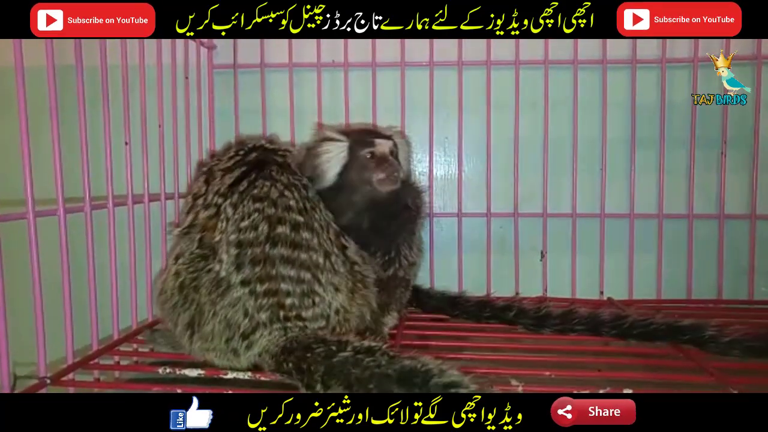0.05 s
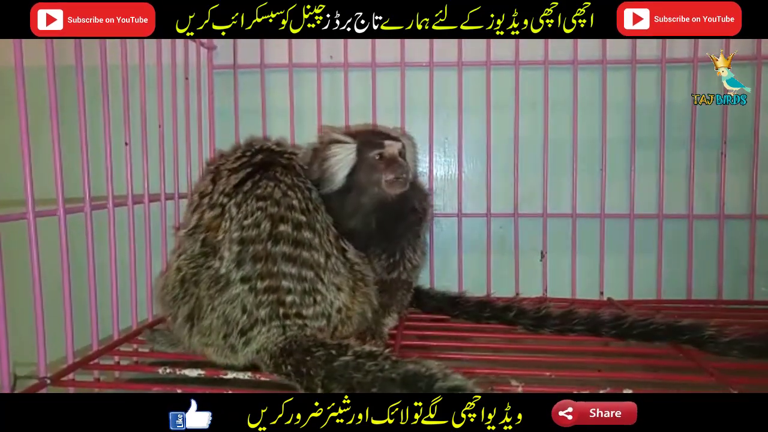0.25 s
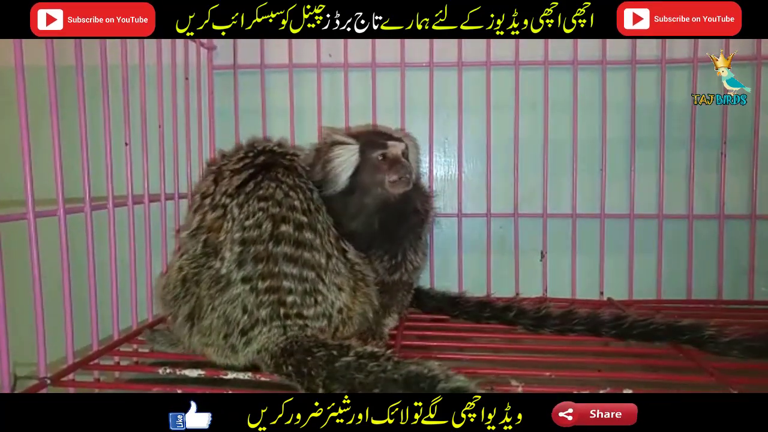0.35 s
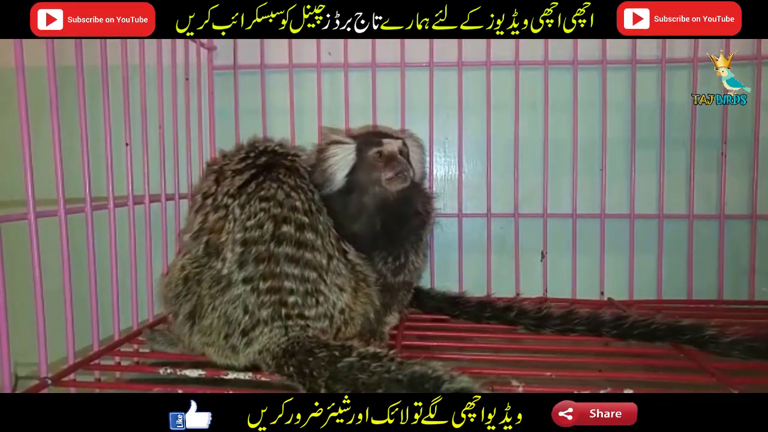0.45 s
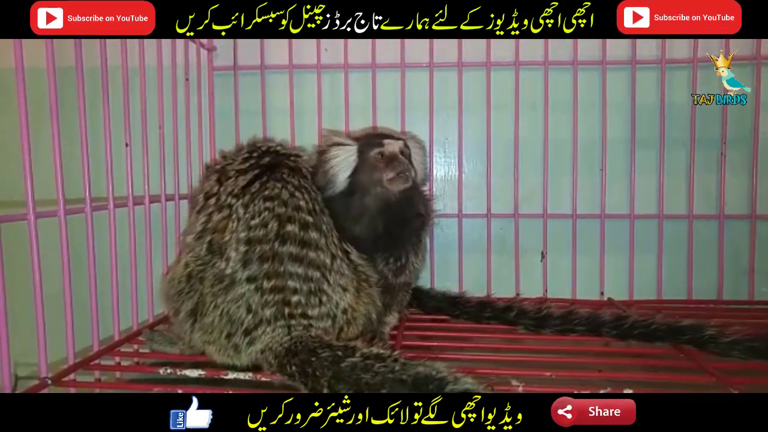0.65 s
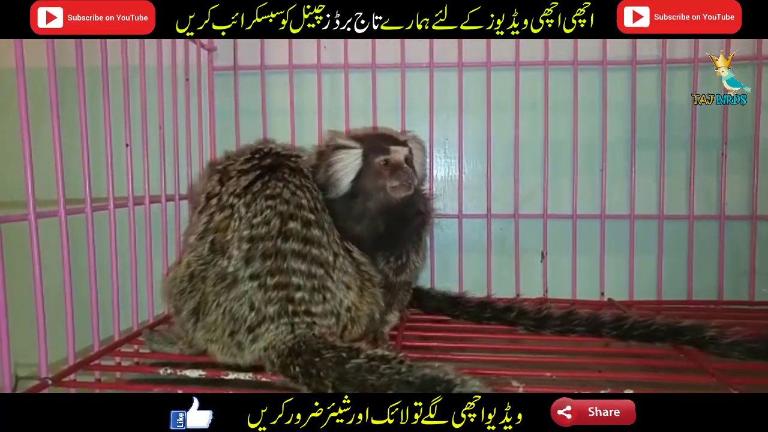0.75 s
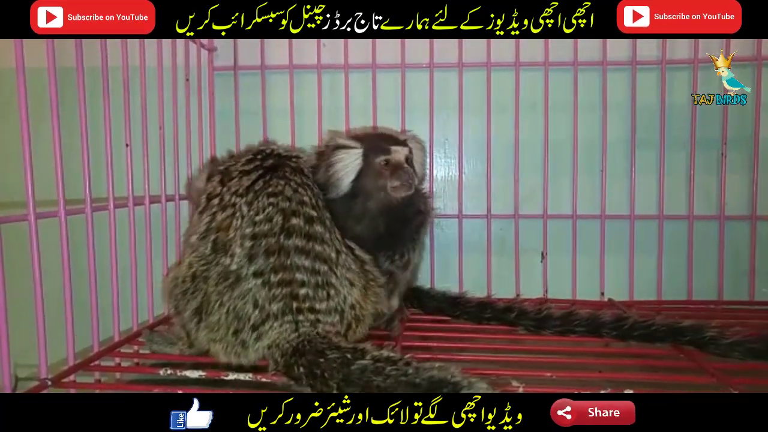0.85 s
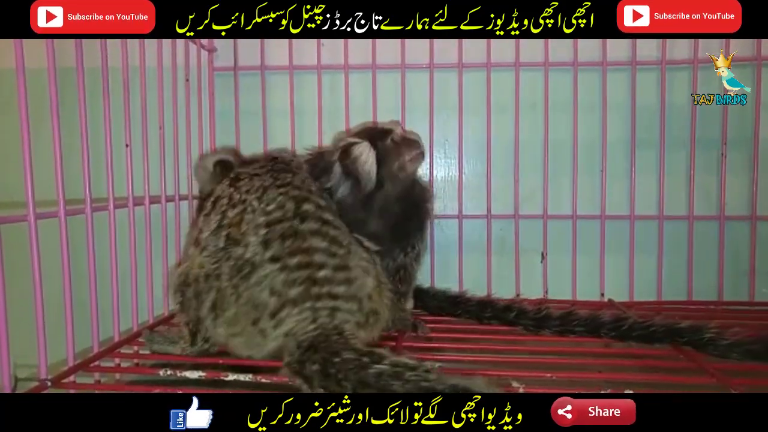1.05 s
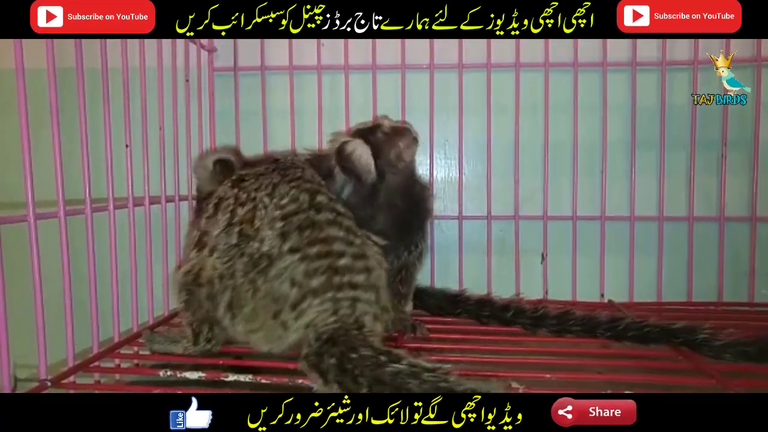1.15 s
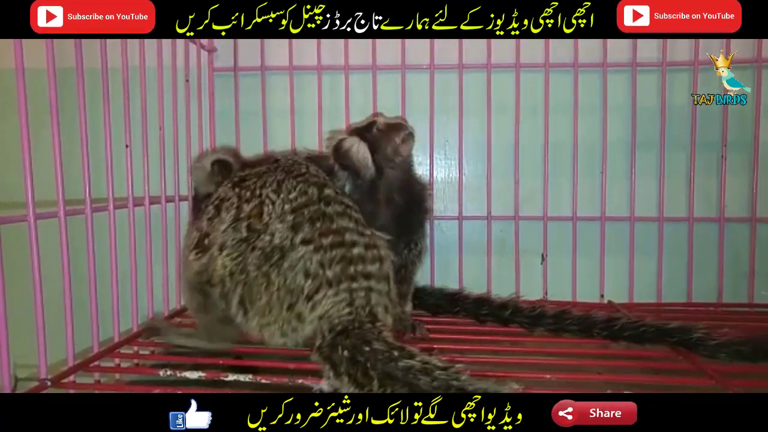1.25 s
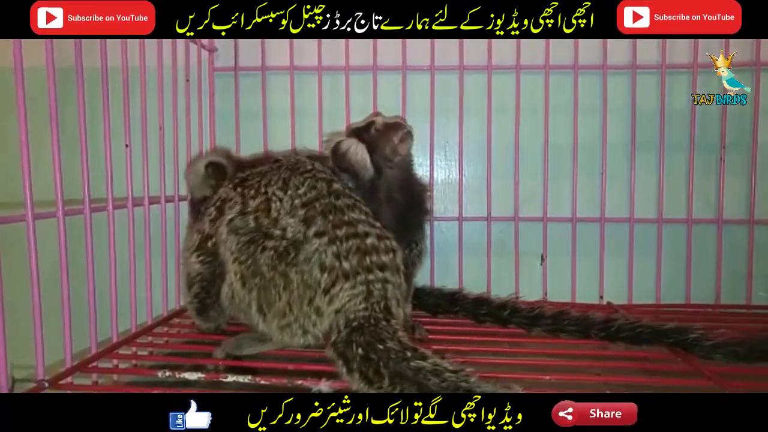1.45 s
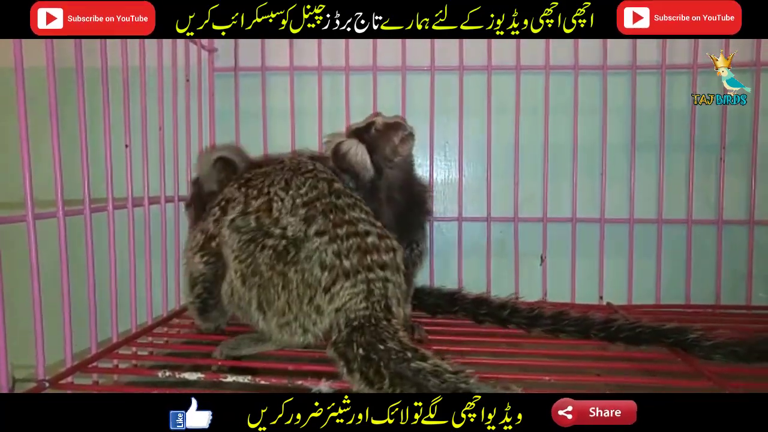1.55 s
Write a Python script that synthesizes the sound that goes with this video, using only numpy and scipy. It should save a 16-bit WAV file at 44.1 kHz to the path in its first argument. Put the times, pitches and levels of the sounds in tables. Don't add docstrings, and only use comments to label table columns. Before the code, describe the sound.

Small monkeys call in a bare, echoing room. A fading trill and tiny peeps open; at 0.18 s a paw knocks the wire cage with a bright rustle as a close, piercing pure whistle bends upward until 0.34 s. Distant trills climb until 0.6 s, then a higher one descends from 0.7 to 1.1 s. A faint bird squawk follows at 1.13 s, then a weak peep near 1.53 s, over quiet fan hum and scuffles.

```python
import sys
import numpy as np
from scipy import signal
from scipy.fft import rfft, irfft
from scipy.io import wavfile

SR = 44100
rng = np.random.default_rng(int(sys.argv[2]) if len(sys.argv) > 2 else 0)


def gain_from_db(level_db):
    decades = np.asarray(level_db, float) / 20
    return 10 ** decades


def store_pcm(level_fs):
    pcm = np.round(np.clip(level_fs, -1, 1) * 32767).astype(np.int16)
    wavfile.write(sys.argv[1], SR, np.atleast_2d(pcm).T)


N = 70560
LEAD = 11025
TOTAL = N + LEAD


def seconds():
    return np.arange(-LEAD, N) / SR


def rms_one(x):
    return x / np.sqrt(np.mean(x ** 2) + 1e-20)


def at_hz(points, hz):
    curve_hz, value = np.array(points).T
    return np.interp(np.log(hz), np.log(curve_hz), value)


def drift(rate_hz):
    r = np.exp(-2 * np.pi * rate_hz / SR)
    wander = signal.lfilter([1], [1, -2 * r, r * r], rng.standard_normal(TOTAL + SR))
    return rms_one(wander[SR:])


def coloured(spectrum, alike):
    hz = np.maximum(np.arange(TOTAL // 2 + 1) * SR / TOTAL, 10)
    octaves_below = np.maximum(np.log2(spectrum[0][0] / hz), 0)
    tilt = gain_from_db(at_hz(spectrum, hz) - 20 * octaves_below)
    mid, side = rfft(rng.standard_normal((2, TOTAL))) * tilt
    c = np.clip(at_hz(alike, hz), 0, 1)
    both = np.sqrt(1 + c) * mid + np.sqrt(1 - c) * side * [[1], [-1]]
    return rms_one(irfft(both, TOTAL))


def place(x, direct_db, wet_db, pan_db, lag=0):
    wet_pan = 0.42 * pan_db / 2
    return np.array([np.roll(x, lag) * gain_from_db(direct_db + pan_db / 2),
                     x * gain_from_db(direct_db - pan_db / 2),
                     x * gain_from_db(wet_db + wet_pan),
                     x * gain_from_db(wet_db - wet_pan)])


def call(contour, trill_hz=30, top_s=0., overtones_db=(), throat_hz=15500, jitter_hz=15, shimmer_db=1, low_db=0):
    t = seconds()
    s, hz, db, *depth_hz = np.transpose(contour)
    swing = 0
    if depth_hz:
        swing = np.interp(t, s, depth_hz[0]) * np.cos(2 * np.pi * trill_hz * (t - top_s))
    pitch = np.interp(t, s, hz) + swing + jitter_hz * drift(61.6)
    phase = 2 * np.pi * np.cumsum(pitch) / SR
    tone = np.sin(phase)
    for k, db_k in enumerate(overtones_db, 2):
        throat_loss_db = 0.0085 * np.maximum(k * pitch - throat_hz, 0)
        tone = tone + gain_from_db(db_k - throat_loss_db) * np.sin(k * phase)
    loudness_db = np.interp(t, s, db, -150, -150) + shimmer_db * drift(60) - low_db * swing / 1000
    return np.sqrt(2) * tone * gain_from_db(loudness_db)


def room(x):
    # pitch_hz, t60_s
    room_t60 = [(1200, .8), (3500, .7), (8000, .42), (14000, .22)]
    early_t60_s, early_db, first_echo_s = .15, -4, .004
    t = np.arange(SR) / SR
    edges = 300 * 2 ** np.arange(0, 6.1, .5)
    white = rng.standard_normal((2, 2, SR))
    echoes = 0
    for k, (low, high) in enumerate(zip(edges, edges[1:])):
        t60 = at_hz(room_t60, np.sqrt(low * high))
        early = gain_from_db(2 * early_db - 120 * t / early_t60_s) / early_t60_s
        tail = gain_from_db(-120 * t / t60) / t60
        fall = np.sqrt(early + tail) * (t > first_echo_s)
        bandpass = signal.butter(2, [low, high], "band", fs=SR, output="sos")
        band = signal.sosfilt(bandpass, white[k % 2])
        echoes = echoes + band * fall / np.sqrt(np.sum(fall ** 2))
    return signal.fftconvolve(x, echoes, axes=1)[:, :x.shape[1]]


def fan():
    # time_s, level_db
    fan_effort = [(0, 1.5), (.3, 3.5), (.7, 3), (.82, 5.5), (1.08, 3), (1.2, 3), (1.4, -1.5), (1.6, 4)]
    # pitch_hz, level_db (rms), wander_db
    hum_lines = [(48.4, -72, -4.5), (77.2, -70, 5.5), (99.9, -60, -3.5), (373, -77.5, 5)]
    # pitch_hz, level_db (per Hz)
    room_noise = [(34, -30), (42, -12), (150, -16), (380, -15), (500, -24), (750, -20), (1600, -30),
                  (9500, -37), (12500, -57)]
    # pitch_hz, likeness (0 to 1)
    likeness = [(60, 0.7), (250, 0.77), (480, 0.84), (1000, 0.11), (8000, 0.11)]
    t = seconds()
    effort_db = np.interp(t, *np.transpose(fan_effort))
    hum = 0
    for hz, db, wander_db in hum_lines:
        level = np.sqrt(2) * gain_from_db(db + wander_db * drift(4.1))
        hum = hum + level * np.sin(2 * np.pi * hz * t + 0.16 * drift(9.8) + rng.uniform(0, 5.28))
    air = gain_from_db(-61.5 + effort_db + 0.89 * drift(15)) * coloured(room_noise, likeness)
    return hum * gain_from_db(0.8 * effort_db) + air


def scuffles():
    # start_s, length_s, level_db
    bursts = [
        (0.355, 0.3, -64),
        (0.715, 0.08, -58.5),
        (1.148, 0.061, -63),
    ]
    # pitch_hz, level_db (per Hz)
    scuffle_colour = [(900, -2), (1400, 7.5), (2500, 8), (3300, 5.5), (4500, 7.5), (6000, -38.5),
                      (8000, -59)]
    t = seconds()
    swell = 0
    for s, length, db in bursts:
        rise = np.clip((t - s) / 0.03, 0, 1)
        fall = np.exp(-np.maximum(t - s - length, 0) / 0.044)
        swell = swell + gain_from_db(db) * rise * fall
    noise = coloured(scuffle_colour, [(100, .01), (10000, .01)]) * swell * gain_from_db(1.5 * drift(17))
    return np.vstack([noise, 0 * t, 0 * t])


def birds():
    # time_s, pitch_hz, level_db
    squawk_contour = [(1.128, 990, -92), (1.136, 1015, -60), (1.152, 1035, -57), (1.175, 1030, -63),
                      (1.205, 1030, -66), (1.225, 1030, -76), (1.25, 1035, -66), (1.275, 1030, -74),
                      (1.3, 1025, -95)]
    # start_s, length_s, pitch_hz, level_db
    far_chirps = [
        (0.339, 0.12, 1381, -63.5),
        (0.436, 0.12, 2143, -66),
        (0.712, 0.081, 2358, -63.5),
        (0.965, 0.058, 1856, -64.5),
    ]
    squawk = call(squawk_contour, overtones_db=(-7, -10.5, -14, -14), jitter_hz=7.36, shimmer_db=1.5)
    far = 0
    for s, length, hz, db in far_chirps:
        end = s + length
        chirp = [(s, hz, db - 10), (s + .02, hz, db), (end, hz, db), (end + .02, hz, db - 20)]
        far = far + call(chirp, jitter_hz=13)
    return place(squawk, -0.49, 3.1, 0.44) + place(far, -10.0, -0.63, 0.27)


def cage():
    # time_s, level_db (peak)
    knocks = [
        (0.1777, -40),
        (0.1805, -43.5),
        (1.4734, -74.5),
        (1.5925, -56),
    ]
    # pitch_hz, level_db, t60_s
    modes = [(773, -10.5, 0.36), (1056, 6, 0.026), (1290, 10, 0.039), (1514, 2.5, 0.02),
             (3830, -20.5, 0.0171), (7600, 16, 0.026), (8600, 12, 0.026)]
    # pitch_hz, level_db (per Hz)
    rustle_colour = [(3000, -25.5), (4300, -6), (5500, -7), (8000, 1), (14500, -2), (16000, -15)]
    rustle_s, rise_s, fall_s, rustle_db = .177, 0.012, 0.021, -33.5
    ring = np.zeros(TOTAL)
    strength_db = rng.normal(0, 1.1, (len(knocks), len(modes)))
    for k, (hz, level_db, t60) in enumerate(modes):
        clicks = np.full(TOTAL, 1e-18)
        for (s, db), own_db in zip(knocks, strength_db):
            clicks[int(s * SR) + LEAD] = gain_from_db(db + level_db - 12 + own_db[k])
        r = gain_from_db(-60 / (t60 * SR))
        w = 2 * np.pi * hz / SR
        ring += signal.lfilter([0, np.sin(w)], [1, -2 * r * np.cos(w), r * r], clicks)
    u = np.maximum(seconds() - rustle_s, 0)
    puff = (1 - np.exp(-u / rise_s)) * np.exp(-u / fall_s) * gain_from_db(rustle_db + 4 * drift(300))
    hiss = coloured(rustle_colour, [(100, 0.6), (10000, 0.48)]) * puff
    return place(ring, 0.3, -8, 3) + np.vstack([hiss, gain_from_db(-10) * hiss])


def distant_monkeys():
    # time_s, pitch_hz, level_db, and for trills depth_hz (vibrato)
    earlier_low = [(-.1, 4770, -86, 200), (.02, 4470, -64.5, 250), (.14, 4840, -72, 200),
                   (.17, 4400, -86, 198)]
    earlier = [(-.2, 6000, -37, 600), (-.15, 6530, -63.5, 900), (-.03, 7194, -47, 1163),
               (0.0, 6960, -60, 291), (.04, 7120, -49, 99)]
    peeps = [(.07, 7450, -80), (.09, 7500, -60), (.114, 7530, -55), (.126, 7480, -75), (.137, 7390, -52),
             (.158, 7370, -56), (.166, 7400, -85)]
    rising = [(.195, 4530, -70, 195), (.215, 5080, -40, 284), (.25, 5296, -44, 208), (.33, 5680, -44, 350),
              (.44, 5995, -44, 537), (.5, 6490, -44.5, 580), (.55, 7160, -43.5, 518), (.59, 7700, -54, 402),
              (.61, 7200, -79, 384)]
    level_trill = [(.39, 4950, -85, 250), (.405, 5000, -51, 400), (.43, 4950, -44, 250),
                   (.455, 4870, -44, 170), (.49, 4900, -50, 300), (.53, 4850, -52, 350),
                   (.57, 4800, -58, 300), (.61, 4750, -64, 250), (.63, 4750, -85, 250)]
    rising_again = [(.68, 4970, -50, 155), (.698, 4980, -45.5, 153), (.76, 5560, -50, 292),
                    (.82, 6094, -49.5, 540), (.88, 6270, -52.5, 560), (.94, 6350, -47, 507),
                    (.985, 5880, -108, 309.5), (1.0, 5800, -84, 300)]
    falling = [(.7, 9350, -75, 100), (.718, 9100, -53, 350), (.737, 8800, -36.5, 600),
               (.81, 8650, -37.5, 680), (.87, 8250, -41, 950), (.96, 7950, -39, 650),
               (1.015, 8080, -37, 220), (1.062, 8220, -29, 50), (1.078, 8180, -41, 40),
               (1.135, 8150, -66, 40)]
    last = [(1.52, 6060, -85), (1.525, 6060, -56), (1.536, 6080, -53), (1.546, 6070, -57),
            (1.561, 6030, -66), (1.566, 6150, -54), (1.58, 6180, -54), (1.592, 6140, -62),
            (1.62, 6250, -55)]
    low_call = call(earlier_low, trill_hz=28.2, overtones_db=(1.5,), jitter_hz=81)
    early_call = call(earlier, trill_hz=27.84, overtones_db=(-18,))
    peep_call = call(peeps, overtones_db=(-8,))
    rise = call(rising, trill_hz=25, top_s=.503, overtones_db=(-14,), throat_hz=12500, jitter_hz=50)
    steady = call(level_trill, trill_hz=29.5, top_s=.416, overtones_db=(2,), jitter_hz=25, shimmer_db=3)
    second_rise = call(rising_again, trill_hz=27, top_s=.825, overtones_db=(-12,), throat_hz=12500, jitter_hz=90)
    descent = call(falling, trill_hz=31, top_s=.718, overtones_db=(-18,), throat_hz=15300,
                   jitter_hz=70, shimmer_db=3, low_db=5)
    last_call = call(last, overtones_db=(6,), jitter_hz=25, shimmer_db=1.5)
    return (place(low_call, -49, 1.0, .3)
            + place(early_call, 4, 6.3, 5.5)
            + place(peep_call, -0.59, 2, 5.7)
            + place(rise, -11, -1, 8, 3)
            + place(steady, 1, 2, -3)
            + place(second_rise, -15, 0, 2, 3)
            + place(descent, -9, 0, -5, 6)
            + place(last_call, 2, -10, -5))


def near_whistle():
    # time_s, pitch_hz, level_db
    whistle = [(.179, 7680, -60), (.184, 7760, -43), (.226, 8005, -27), (.25, 8095, -18.5),
               (.27, 8120, -18), (.321, 8140, -18), (.328, 8240, -22), (.334, 8700, -33), (.341, 8850, -70)]
    near = place(call(whistle, jitter_hz=1.5, shimmer_db=.1), 0, -11.5, 1)
    near[1] = .35 * near[1] + .8 * np.roll(near[1], 1)
    return near


def scene():
    mix = scuffles() + birds() + cage() + distant_monkeys() + near_whistle()
    direct, sent = mix[:2], mix[2:]
    return (direct + room(sent) + fan())[:, LEAD:]


def low_pass(x):
    return signal.sosfilt(signal.butter(12, 16660, fs=SR, output="sos"), x)


def record(dry):
    cut = signal.sosfilt(signal.cheby2(10, 50, 16550, fs=SR, output="sos"), dry)
    return low_pass(cut)


dry = scene()
out = record(dry)
store_pcm(out)
```